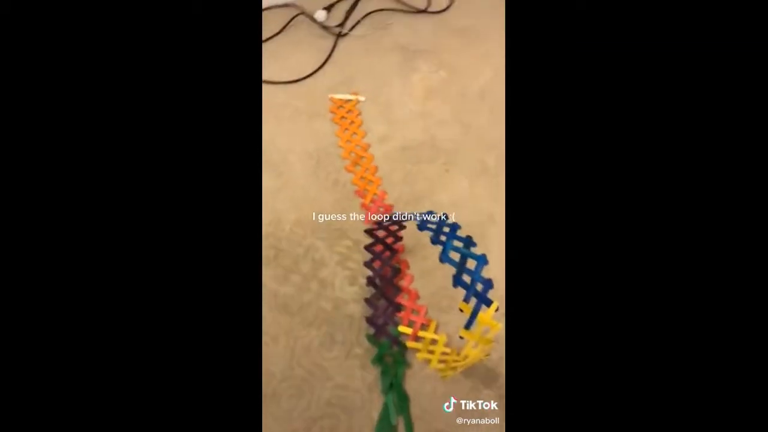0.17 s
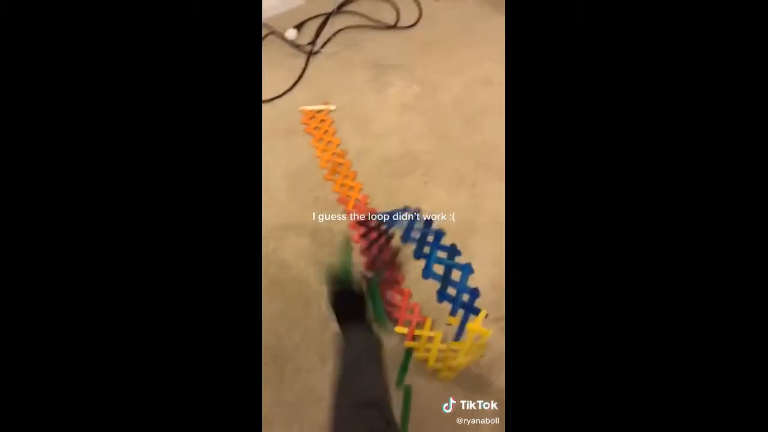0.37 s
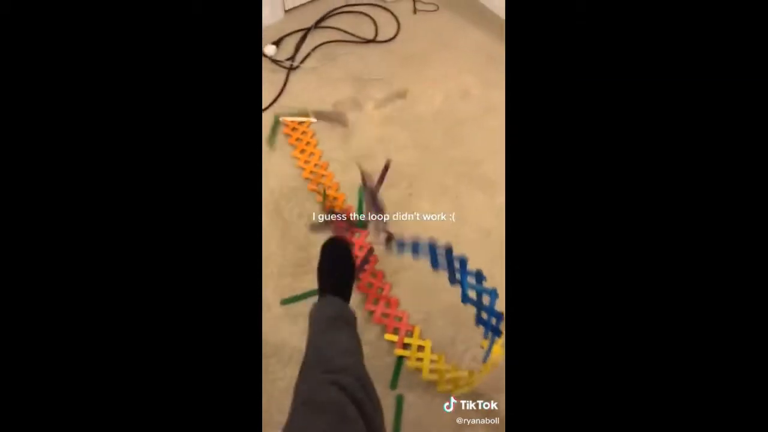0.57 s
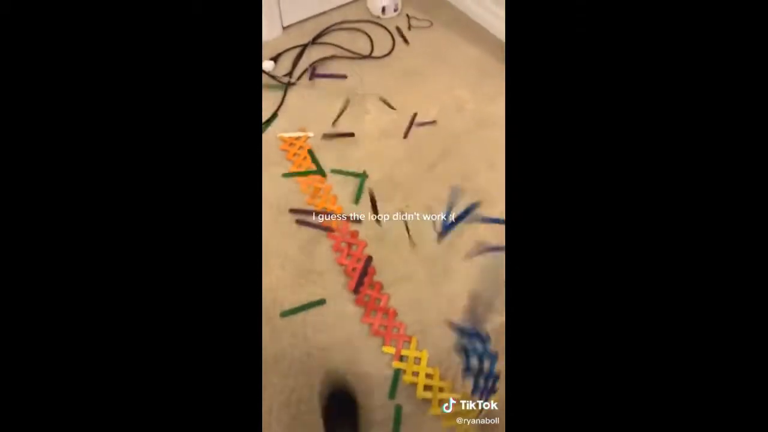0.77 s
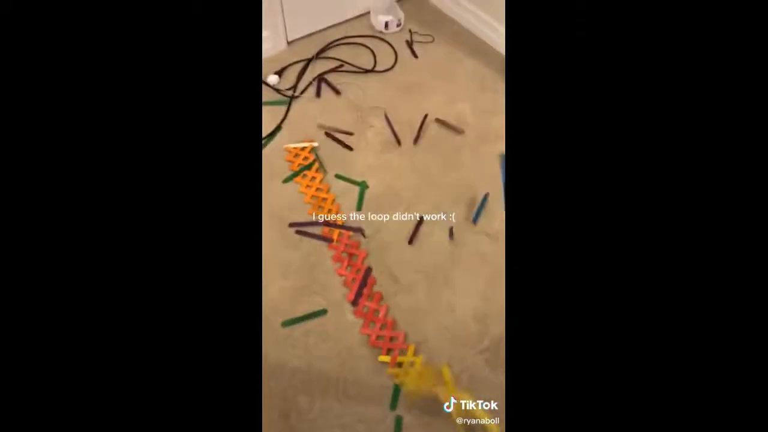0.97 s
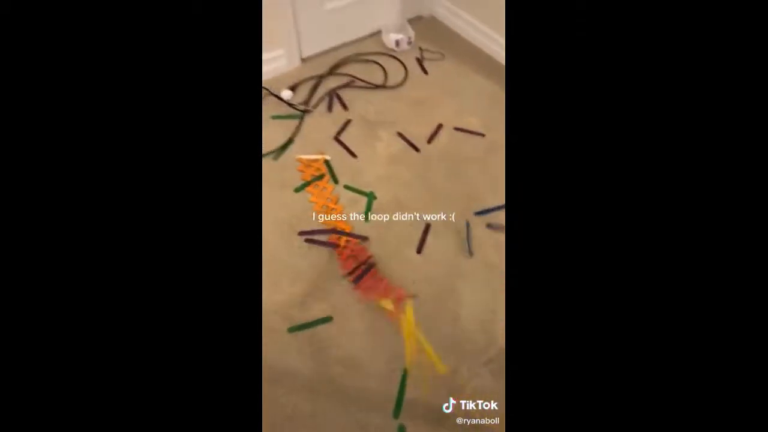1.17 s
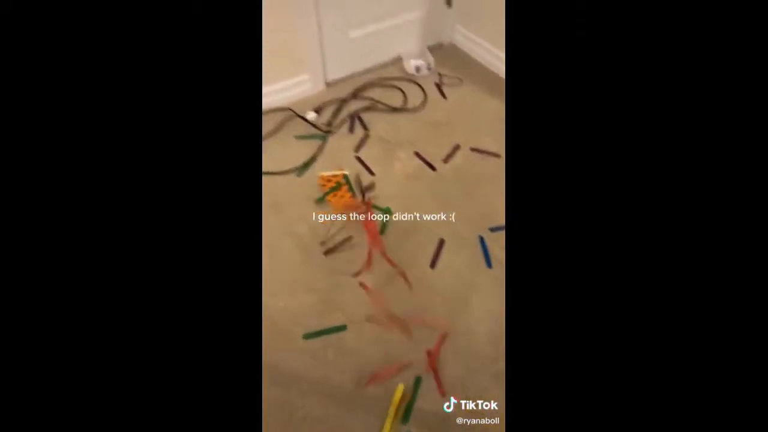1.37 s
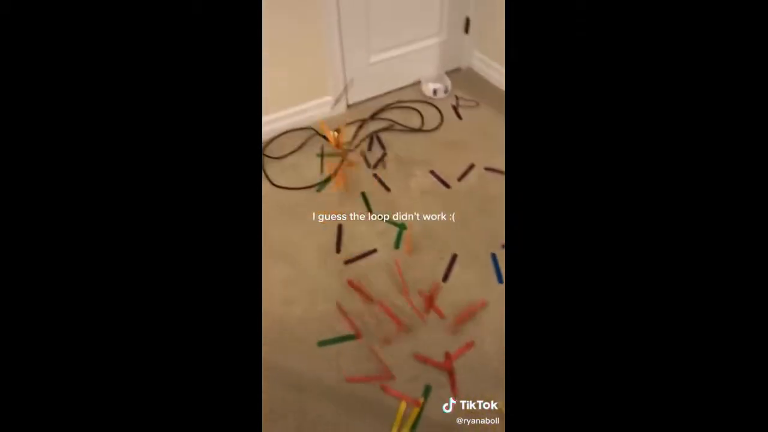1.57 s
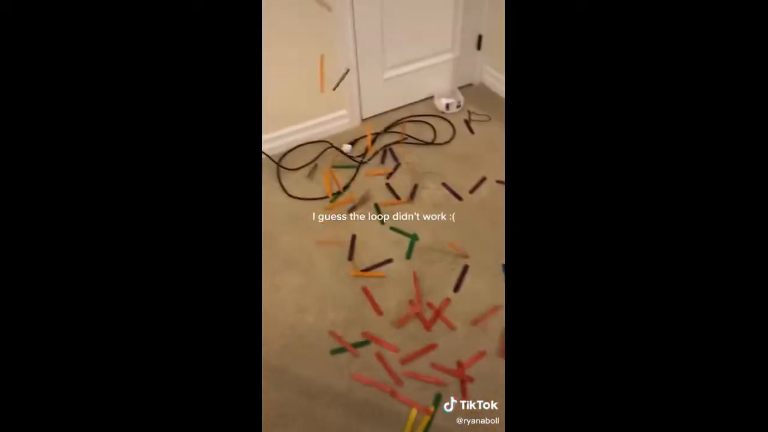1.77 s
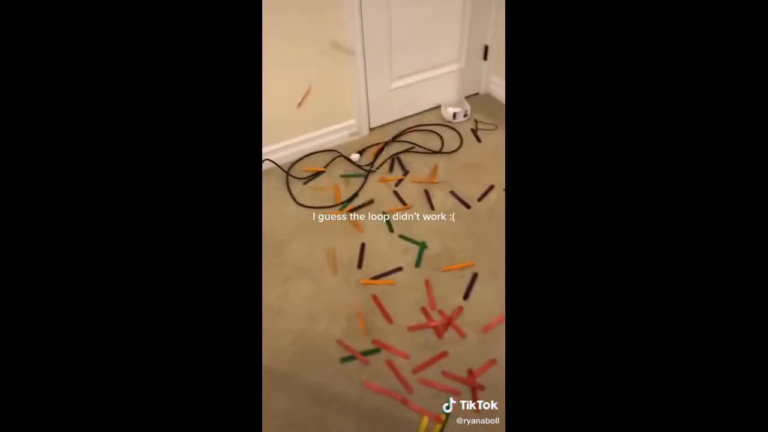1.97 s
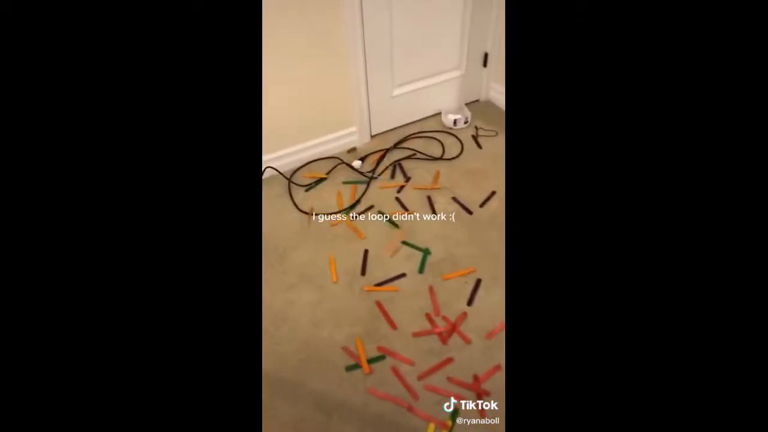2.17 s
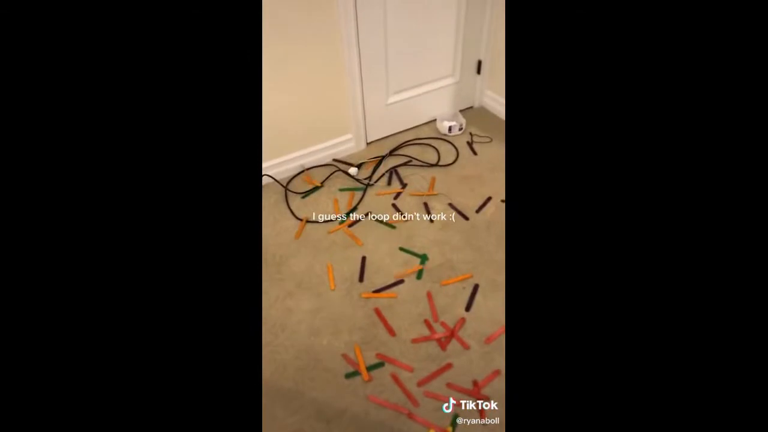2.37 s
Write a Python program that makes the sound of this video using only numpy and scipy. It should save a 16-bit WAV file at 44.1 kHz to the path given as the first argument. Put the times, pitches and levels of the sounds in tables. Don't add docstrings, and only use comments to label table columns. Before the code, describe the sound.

A woven chain of thin wooden sticks springs apart: near silence, a sharp fizzing crackle, then drier clattering runs and a few last ticks on carpet, heard close on a phone in a small room.

```python
import sys
import numpy as np
from scipy import signal
from scipy.fft import rfft, irfft
from scipy.io import wavfile
from scipy.ndimage import uniform_filter1d

SR = 44100
rng = np.random.default_rng(int(sys.argv[2]) if len(sys.argv) > 2 else 0)


def put_to_file(sound):
    columns = np.atleast_2d(sound).T
    safe = np.clip(columns, -1, 1)
    whole_steps = np.round(safe * 32767)
    wavfile.write(sys.argv[1], SR, whole_steps.astype(np.int16))


N = 108045

# freq_hz, level_db
RUMBLE_SPECTRUM = [(25, -54), (48, 0), (86, 7), (130, 4.5), (198, -19), (430, -18), (5000, -38.5),
                   (9250, -31), (13000, -44)]
RUMBLE_DB = -54
# start_s, boost_db
RUMBLE_SWELL = [
    (0, 1.5),
    (.15, 1),
    (.27, 4.5),
    (.38, -2.5),
    (2.0, -2.5),
    (2.2, -5),
    (2.25, -2),
    (2.38, 0),
    (2.45, -2.5),
]
# start_s, level_db
SHUFFLE = [
    (0, -67),
    (.7, -59.5),
    (.9, -48.5),
    (1.08, -55),
    (1.3, -46),
    (1.65, -60.5),
    (1.9, -49),
    (2.12, -65.5),
    (2.3, -56),
    (2.45, -64),
]
SHUFFLE_HZ = 125, 472

# start_s, peak_db, strongest_ring_hz, rattle_t60_s
KNOCKS = [(0.021, -45, 2550, 0.11), (0.172, -31.5, 3770, 0.11), (0.2213, -30, 7620, 0.03),
          (0.234, -22.5, 8300, 0.06), (0.257, -15.5, 8240, 0.074), (0.281, -6.5, 2100, 0.012),
          (0.3305, -12, 9200, 0.055), (0.4493, -25, 9480, 0.078), (0.5207, -14.5, 7500, 0.16),
          (0.531, -13, 9600, 0.073), (0.5431, -14, 9000, 0.3), (0.5798, -15.5, 9400, 0.037),
          (0.6538, -21, 9200, 0.11), (0.697, -13.5, 9600, 0.07), (0.7299, -15, 9700, 0.17),
          (0.8122, -26.5, 1900, 0.2), (0.8735, -27.5, 3280, 0.045), (0.8866, -26, 2200, 0.023),
          (0.9148, -22.5, 2340, 0.039), (0.9587, -28, 5170, 0.036), (0.9766, -11.5, 8740, 0.051),
          (1.1159, -35, 5400, 0.033), (1.1296, -16.5, 3900, 0.06), (1.157, -27, 4300, 0.082),
               (1.1744, -25, 3040, 0.03), (1.191, -19, 5250, 0.045), (1.2661, -15, 5900, 0.069),
               (1.3432, -20.5, 6100, 0.028), (1.3613, -19.5, 5660, 0.073), (1.453, -25, 5430, 0.044),
               (1.479, -16, 4240, 0.1), (1.5158, -18.5, 5750, 0.06), (1.563, -17.5, 12100, 0.049),
               (1.617, -26, 5400, 0.076), (1.6435, -26, 5430, 0.053), (1.6764, -25, 4300, 0.029),
               (1.707, -17.5, 7340, 0.043), (1.7443, -26, 9000, 0.048), (1.7487, -16, 9150, 0.029),
               (1.8182, -21.5, 5630, 0.021), (1.879, -27.5, 5530, 0.12), (1.887, -28, 3180, 0.05),
               (1.957, -34.5, 4430, 0.026), (1.9974, -24, 5230, 0.066), (2.0505, -20, 9200, 0.11),
               (2.137, -20, 9300, 0.045), (2.161, -20.5, 7400, 0.055), (2.1762, -19, 11700, 0.039),
               (2.2564, -41, 5000, 0.027), (2.2723, -27, 7160, 0.089), (2.3978, -31.5, 5400, 0.044),
          (0.3, -23, 1700, 0.13),
    (2.297, -27, 910, 0.14),
]
# freq_hz, level_db
STICK_MODES = [
    (2150, -6),
    (4300, -4.5),
    (5400, -3),
    (6950, 0.5),
    (9080, 1),
    (11000, 2.5),
    (12500, 1.5),
]
KNOCK_DB, MAIN_RING_DB, BODY_DB, CONTACT_SPREAD_DB = -2, -8.5, -8, 5.5
KNOCK_RISE_S, FIRST_CONTACT_S, STICK_T60_S, RING_CYCLES = .0012, .003, .012, 28
STICK_SCATTER, CRISP = .03, .94

# start_s, level_db, bright_scraping_share (0-1)
SCRAPE_RUNS = [
    [(.13, -68, 0.8), (.21, -55.5, 0.4), (.225, -38, 0.96), (.3, -28, 1), (.34, -33, 1), (.385, -38, 0.99),
     (.43, -35, 1), (.51, -43, 0.89)],
    [(.522, -38.5, 0.92), (.6, -37, 1), (.635, -48.5, 0.9), (.69, -41.5, 0.99), (.74, -38.5, 1),
     (.77, -35, 1), (.795, -58.5, 0)],
]
CLATTER_RUNS = [
    [(.8, -46, 0.17), (.87, -48.5, 0.025), (.93, -43.5, 0.27), (1.03, -44, 0.052), (1.11, -46, 0.32)],
    [(1.12, -40, 0.39), (1.2, -33, 0.6), (1.24, -41.5, 0.6), (1.29, -40, 0.51), (1.325, -47.5, 0.071),
     (1.38, -40, 0.51), (1.425, -42, 0.071)],
    [(1.44, -41.5, 0.46), (1.47, -32, 0.099), (1.54, -41, 0.67), (1.63, -46, 0.2), (1.7, -48.5, 0.32),
     (1.745, -50, 0.12)],
    [(1.75, -32, 0.92), (1.8, -43.5, 0.52), (1.86, -52.5, 0.17), (1.95, -57, 0.15), (2.134, -59.5, 0.25)],
    [(2.14, -47.5, 0.2), (2.19, -43, 0.42), (2.23, -53.5, 0.058), (2.36, -51.5, .1), (2.45, -62.5, .1)],
]
# freq_hz, level_db_per_hz
SCRAPE_SPECTRUM = [(120, -44), (200, -22.5), (883, -22.5), (1030, -15.5), (1300, -23), (1810, -14.5),
                   (4640, -20), (9330, -7), (13000, -17.5)]
CLATTER_SPECTRUM = [(120, -35), (200, -2), (332, -11), (1390, 1), (2110, 3.5), (5330, 5.5), (6350, 1),
                    (9330, -8.5), (13000, -0.5)]
TICKS_PER_S, TICK_T60_S, TICK_SPREAD_DB = 5000, .009, 3.2
CLUMP_DB, CLUMP_S = 1.5, .004

# start_s, peak_db, ring_hz
PINGS = [(.2205, -22, 7430), (0.2791, -20, 6630), (0.2778, -21, 4460), (0.2964, -21, 1385),
         (0.312, -15, 9580), (.53, -21, 9210), (.582, -22, 7600), (.698, -26, 9000), (.729, -27, 9560),
         (.918, -26, 7430), (0.978, -25, 8380), (1.131, -21, 3750), (1.1555, -18, 4160), (1.172, -21, 2980),
         (1.195, -20, 9100), (1.198, -17, 4340), (1.443, -24, 9890), (1.461, -20, 9100), (1.483, -19, 4070),
         (1.564, -32, 11200), (1.5714, -22.5, 6970), (1.749, -15, 12340), (1.753, -17, 11200),
         (2.052, -45, 9200), (2.137, -27, 4760), (2.136, -28, 6960), (2.163, -31, 7400), (2.271, -35, 6930),
         (2.271, -35, 5520), (2.271, -47, 3120), (2.398, -53, 2790)]
PING_T60_S, PING_RISE_S = .017, .002

# start_s, peak_db, centre_hz
SNAPS = [(.2821, -13, 6700), (.3252, -13, 9220), (.5223, -17, 7000), (.5426, -11, 9100),
         (.5818, -14, 10400), (.6996, -16, 10600), (.763, -22, 9200), (.9597, -24, 5600),
         (.9772, -18, 6900), (.9803, -16, 7400), (1.13, -19, 2600), (1.1924, -13, 5250),
         (1.4447, -21, 9900), (1.4715, -13, 5080), (1.4761, -8, 5400), (1.5646, -17, 11000),
         (1.7506, -13, 12000), (1.9572, -35, 4300), (1.9979, -26, 5080), (2.1413, -23, 11600),
         (2.1625, -23, 8600), (2.3982, -35, 8600)]
SNAP_SPREAD = [.55, .78, 1.01, 1.18, 1.5]
SNAP_DB, SNAP_T60_S = -1, .006

# start_s, peak_db, ring_hz
THUDS = [(.775, -35, 770), (.777, -30.5, 685), (.78, -34, 246), (.899, -41, 584), (.978, -35.5, 705),
         (1.164, -32.5, 562), (1.23, -33.5, 560), (1.319, -37, 596), (1.482, -38, 346), (1.643, -40.5, 630),
         (1.758, -32, 644), (1.857, -43, 263), (2.053, -45, 594), (2.168, -49.5, 524), (2.228, -43, 116),
         (2.246, -44, 186), (2.296, -38, 178), (2.297, -44.5, 560)]
THUD_RISE_S, THUD_T60_S, THUD_CYCLES = .0037, .034, 20.2
THUD_PAIR = .893

# freq_hz, t60_s
ROOM_DECAY = [
    (300, 0.42),
    (2000, 0.13),
    (6000, 0.14),
    (12000, 0.12),
]
ROOM_DB = -5.5

# from_s, to_s
WIDE = [(.04, .17), (.265, .645), (.715, .955), (1, 1.145), (1.22, 1.26), (1.315, 1.355), (1.405, 1.445),
        (1.52, 1.555), (1.8, 1.85), (1.945, 1.98), (2.215, 2.255), (2.405, 2.435)]
WIDE_DB, WIDE_FROM_HZ, EDGE_HZ = -1.5, 4300, 13190


def gain_of(db):
    return 10 ** (np.asarray(db) / 20)


def evened(x):
    return x / np.sqrt(np.mean(x ** 2) + 1e-20)


def read(points, hz):
    f, value = np.transpose(points)
    return np.interp(np.log(hz + 1), np.log(f + 1), value)


def colour(x, spectrum):
    hz = np.fft.rfftfreq(len(x), 1 / SR)
    return irfft(rfft(x) * evened(gain_of(read(spectrum, hz))), len(x))


def add(mix, s, sound):
    part = mix[round(s * SR):][:len(sound)]
    part += sound[:len(part)]


def rings(hz, db, t60, size=3000):
    t = np.arange(size)[:, None] / SR
    fade = gain_of(db - 60 * t / np.maximum(t60, .002))
    return (fade * np.sin(2 * np.pi * hz * t)).sum(axis=1)


def rumble():
    low = evened(colour(rng.standard_normal(N), RUMBLE_SPECTRUM))
    low = evened(low / (uniform_filter1d(low ** 2, 1800) + .3) ** .35)
    swell = np.interp(np.arange(N) / SR, *np.transpose(RUMBLE_SWELL))
    return gain_of(RUMBLE_DB + swell) * low


def shuffle():
    s, db = np.transpose(SHUFFLE)
    lumps = gain_of(2.1 * evened(uniform_filter1d(rng.standard_normal(N), 900)))
    band = signal.butter(2, SHUFFLE_HZ, "band", fs=SR, output="sos")
    low = signal.sosfilt(band, lumps * rng.standard_normal(N))
    return gain_of(np.interp(np.arange(N) / SR, s, db)) * evened(low)


def knock(s, db, hz, t60, contacts, modes):
    t = np.arange(len(contacts)) / SR
    rattle = contacts * np.minimum(t / KNOCK_RISE_S, 1) * gain_of(-60 * t / np.clip(t60, .008, .25))
    first = np.exp(-t / FIRST_CONTACT_S) * np.sign(contacts)
    ring = signal.oaconvolve(first, rings(hz, 0, RING_CYCLES / hz, size=1000))[:len(t)]
    body = signal.oaconvolve(rattle, rings(modes[0], modes[1], STICK_T60_S, size=900))[:len(t)]
    crisp = signal.lfilter([1, -CRISP * min(hz / 4000, 1)], [1], rattle)
    sound = evened(crisp) + gain_of(MAIN_RING_DB) * evened(ring) + gain_of(BODY_DB) * evened(body)
    return s, gain_of(db + KNOCK_DB) * sound / abs(sound).max()


def all_knocks():
    knocks, rows = np.zeros(N), KNOCKS
    grain, uneven = rng.standard_normal((len(rows), 2, 6000)).transpose(1, 0, 2)
    uneven = evened(uniform_filter1d(uneven, 30, axis=1))
    onset = np.minimum(np.arange(6000) / 300, 1)
    contacts = grain * gain_of(CONTACT_SPREAD_DB * uneven * onset)
    scatter = STICK_SCATTER * rng.standard_normal((len(rows), 1, len(STICK_MODES)))
    modes = np.transpose(STICK_MODES) * (1 + scatter)
    modes[:, 1] += 4.7 * rng.standard_normal((len(rows), len(STICK_MODES)))
    for row, contact, body in zip(rows, contacts, modes):
        add(knocks, *knock(*row, contact, body))
    return knocks


def ticks(count=30):
    clump = evened(uniform_filter1d(rng.standard_normal(N), max(int(CLUMP_S * SR), 1)))
    size = gain_of(TICK_SPREAD_DB * np.minimum(rng.exponential(1, N), 5) + CLUMP_DB * clump)
    size *= rng.random(N) < TICKS_PER_S / SR
    stick, out = rng.integers(0, count, N), np.zeros(N)
    hz = rng.permutation(np.linspace(200, 14000, num=5 * count)).reshape(count, -1)
    for k in range(count):
        out += signal.oaconvolve(size * (stick == k), rings(hz[k], 0, TICK_T60_S, size=1200))[:N]
    return out


def chain(knocks):
    s, db, bright = np.concatenate(SCRAPE_RUNS + CLATTER_RUNS).T
    t = np.arange(N) / SR
    share = np.clip(np.interp(t, s, bright), 0, 1)
    flat = gain_of(np.interp(t, s, db, left=-90)) * evened(ticks()) + knocks
    scraping = colour(np.sqrt(share) * flat, SCRAPE_SPECTRUM)
    clatter = colour(np.sqrt(1 - share) * flat, CLATTER_SPECTRUM)
    return scraping + clatter


def ping(s, db, hz):
    rise = np.minimum(np.arange(2500) / SR / PING_RISE_S, 1)
    return s, rings(hz, db, PING_T60_S, size=2500) * rise


def snap(s, db, hz):
    modes_hz = np.minimum(hz * np.array(SNAP_SPREAD), 13000)
    crack = rings(modes_hz, np.array([-6, 5, 15, -1, -33]), SNAP_T60_S, size=600)
    return s, gain_of(db + SNAP_DB) * crack / abs(crack).max()


def thud(s, db, hz):
    t60 = min(THUD_CYCLES / hz, THUD_T60_S)
    body = rings(hz * np.array([1, THUD_PAIR]), np.array([0, -8]), t60, size=6000)
    body *= np.minimum(np.arange(6000) / SR / THUD_RISE_S, 1)
    return s, gain_of(db) * body / abs(body).max()


def room(x, count=3):
    at = np.arange(120, SR // 2 - 20, 12)
    turn = 2 * np.pi * 11 * np.arange(N) / SR
    out = 0
    for k in range(count):
        taps = np.zeros(SR // 2)
        taps[at + rng.integers(0, 12, len(at))] = rng.choice([-1., 1.], len(at))
        hz, t, z = signal.stft(taps, SR, nperseg=128)
        fade = gain_of(-60 * t / read(ROOM_DECAY, hz)[:, None])
        tail = signal.istft(z * fade, SR, nperseg=128)[1]
        share = np.sqrt(2 / count) * abs(np.cos(turn + np.pi * k / count))
        out = out + signal.fftconvolve(x * share, tail / np.linalg.norm(tail))[:N]
    return out


def scene():
    strikes = np.zeros(N)
    for source, rows in ((ping, PINGS), (snap, SNAPS), (thud, THUDS)):
        for row in rows:
            add(strikes, *source(*row))
    sticks = chain(all_knocks()) + strikes
    softened = signal.lfilter([1, 1], [2], sticks)
    mix = sticks + gain_of(ROOM_DB) * room(softened) + shuffle() + rumble()
    return np.array([mix, mix])


def wide_hiss(mono):
    hz, t, z = signal.stft(mono, SR, nperseg=1024)
    wide = gain_of(WIDE_DB) * sum(1. * (t > a) * (t < b) for a, b in WIDE)
    patches = rng.random((len(t) // 4 + 1, 22)) < .65
    bands = patches.repeat(4, 0).repeat(24, 1)[:len(t), :len(hz)].T
    level = np.sqrt(abs(uniform_filter1d(abs(z) ** 2, 24, 0)))
    noise = np.exp(2j * np.pi * rng.random((len(t), len(hz)))).T
    treble = (hz > WIDE_FROM_HZ)[:, None]
    return signal.istft(noise * level * wide * bands * treble, SR, nperseg=1024)[1][:N]


def top_cut(x):
    return signal.sosfilt(signal.butter(12, 14290, fs=SR, output="sos"), x)


def record(dry):
    side = wide_hiss(dry[0])
    pair = dry + np.array([side, -side])
    band_limit = signal.firwin(511, EDGE_HZ, window=("kaiser", 6), fs=SR)
    mix = signal.oaconvolve(pair, band_limit[None], "same")
    return top_cut(mix)


dry = scene()
out = record(dry)
put_to_file(out)
```